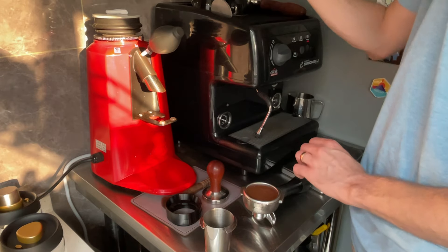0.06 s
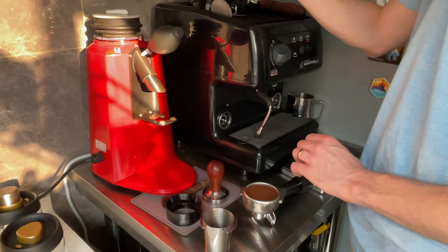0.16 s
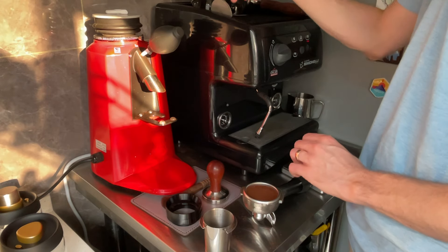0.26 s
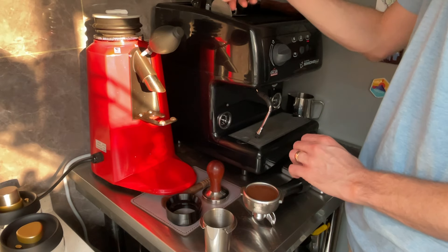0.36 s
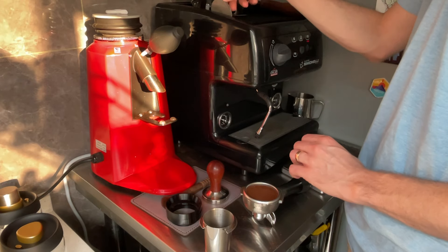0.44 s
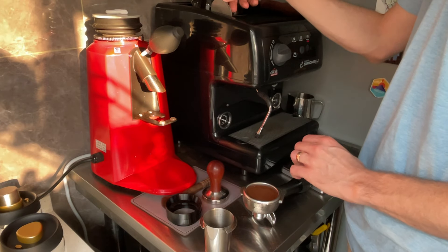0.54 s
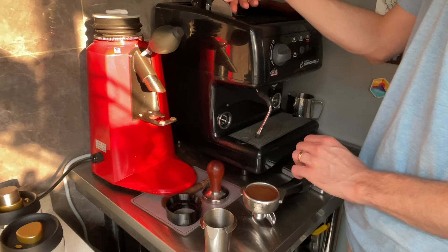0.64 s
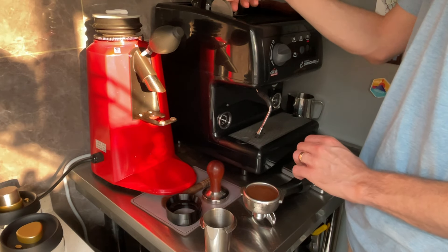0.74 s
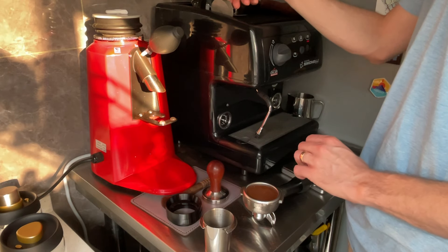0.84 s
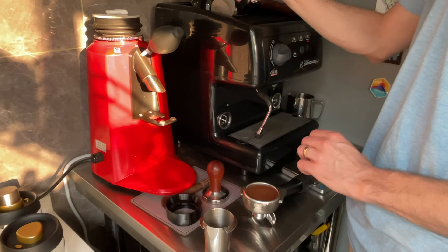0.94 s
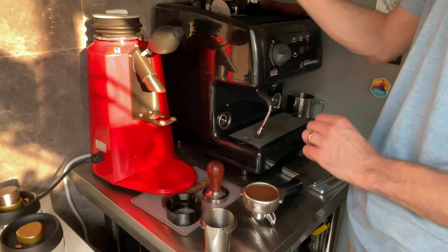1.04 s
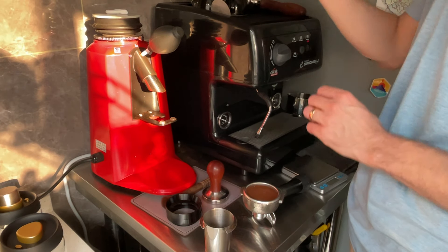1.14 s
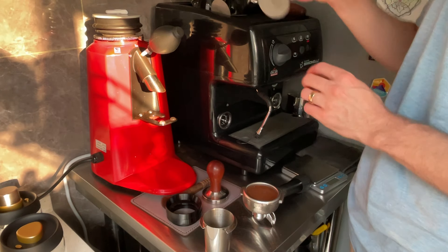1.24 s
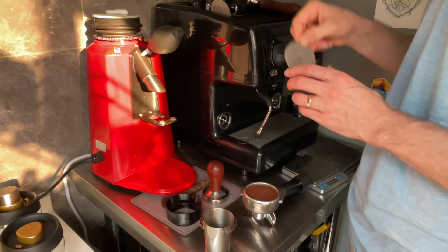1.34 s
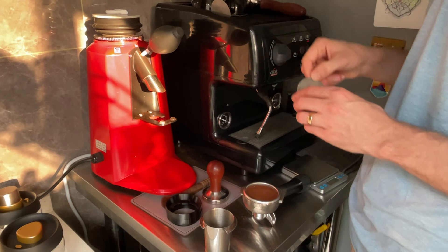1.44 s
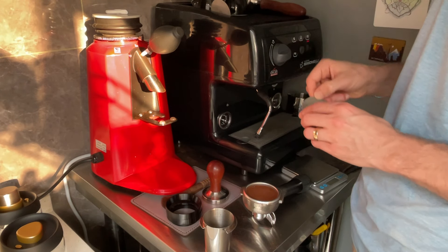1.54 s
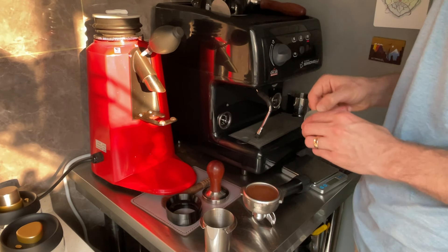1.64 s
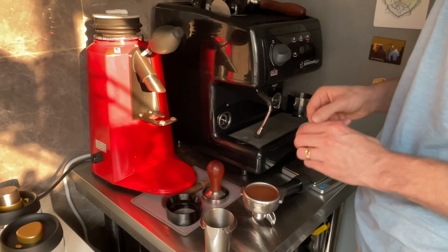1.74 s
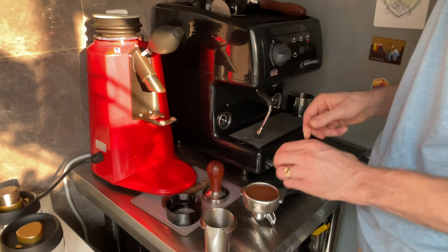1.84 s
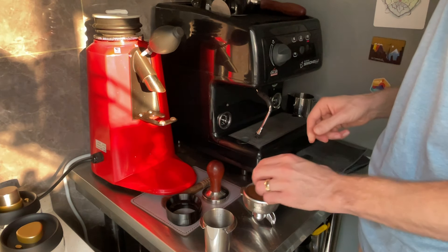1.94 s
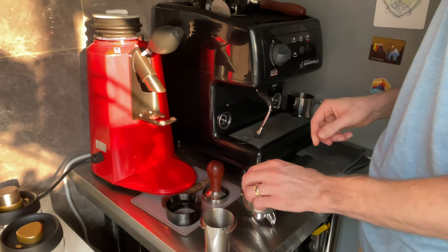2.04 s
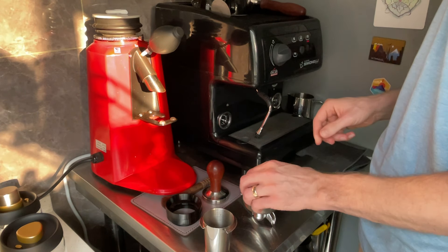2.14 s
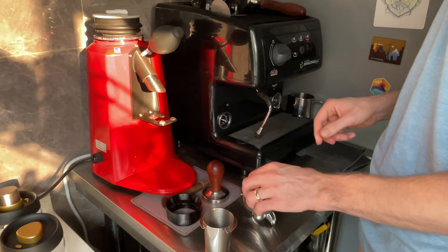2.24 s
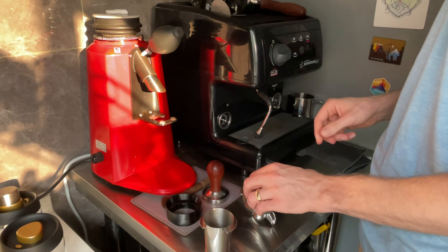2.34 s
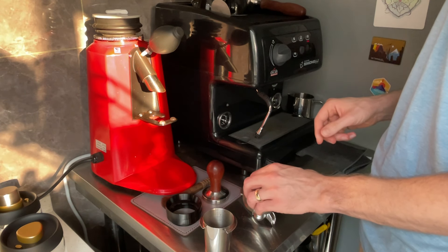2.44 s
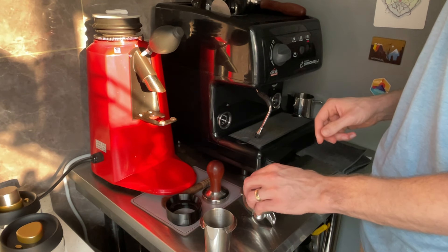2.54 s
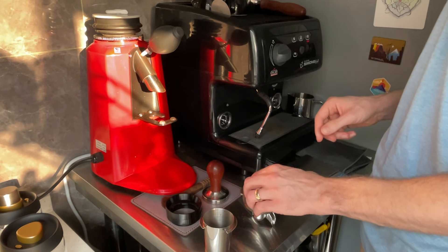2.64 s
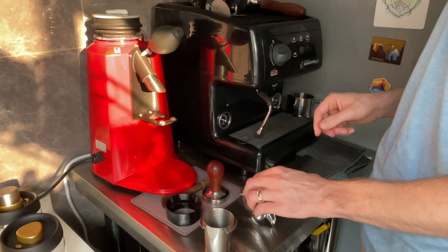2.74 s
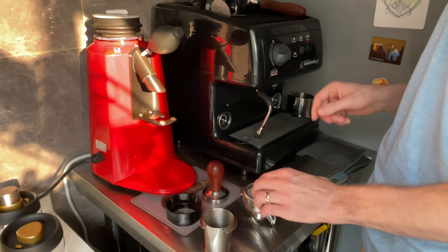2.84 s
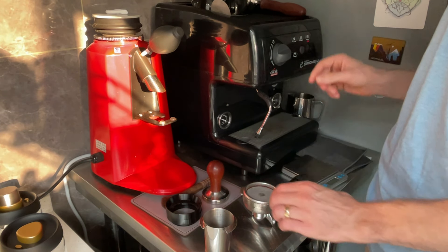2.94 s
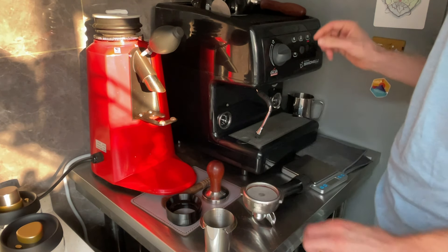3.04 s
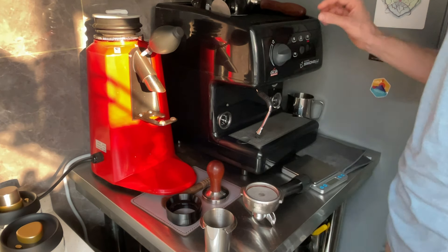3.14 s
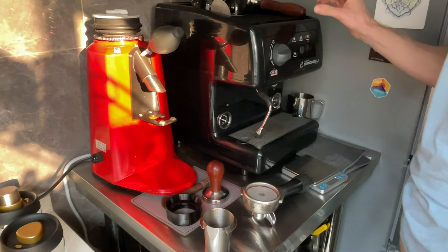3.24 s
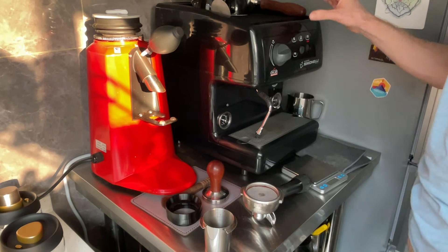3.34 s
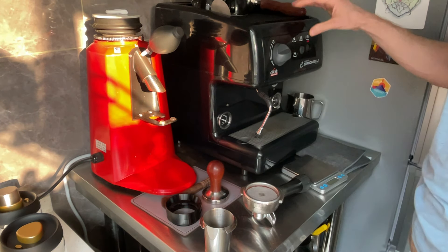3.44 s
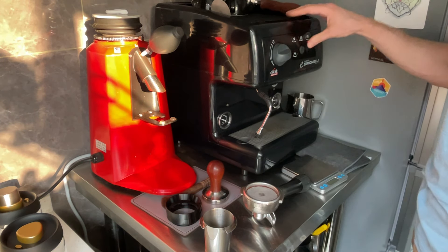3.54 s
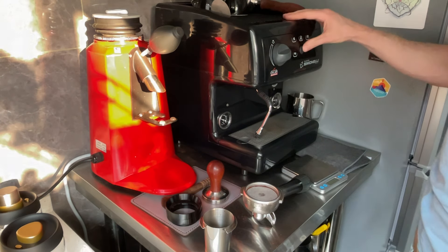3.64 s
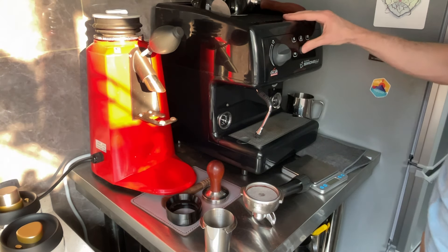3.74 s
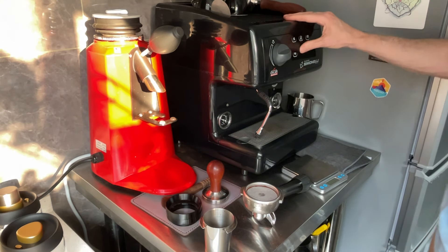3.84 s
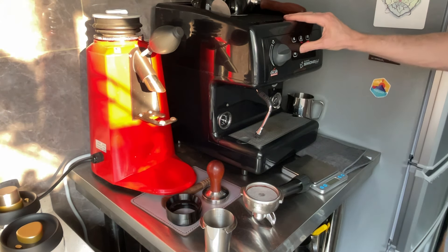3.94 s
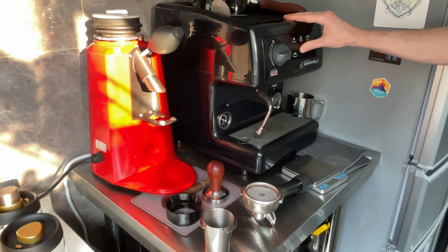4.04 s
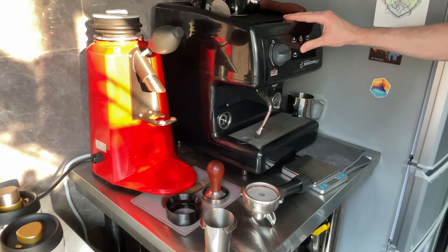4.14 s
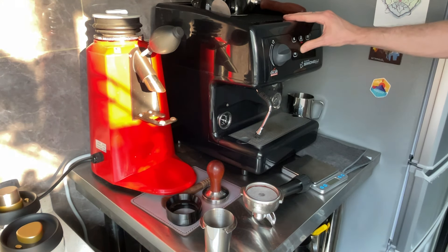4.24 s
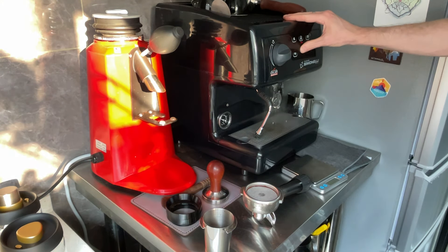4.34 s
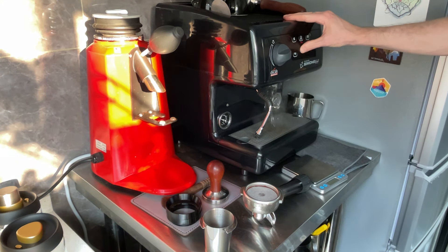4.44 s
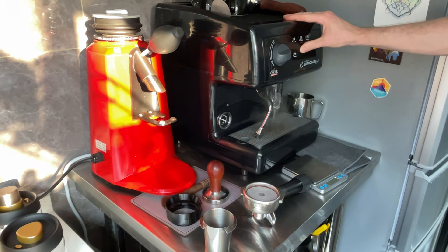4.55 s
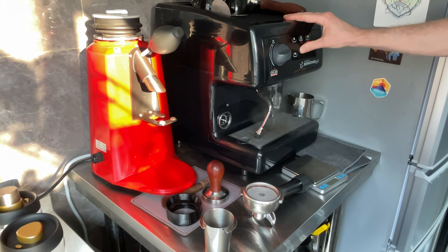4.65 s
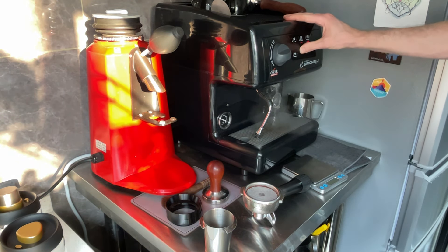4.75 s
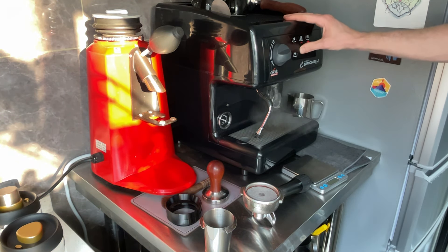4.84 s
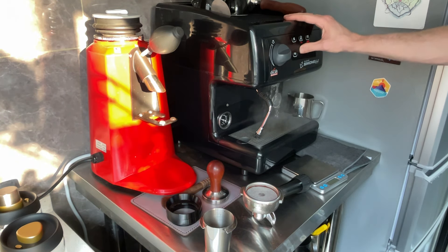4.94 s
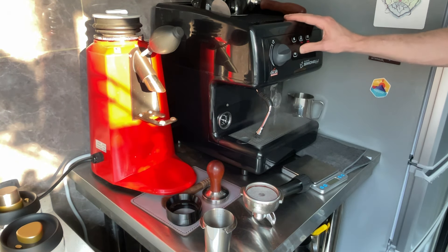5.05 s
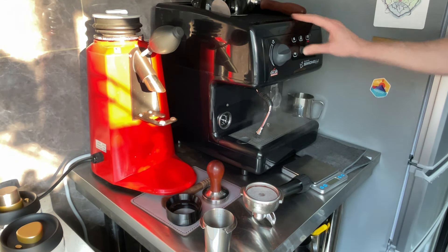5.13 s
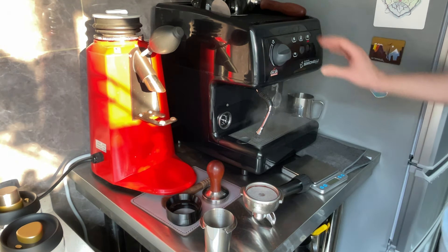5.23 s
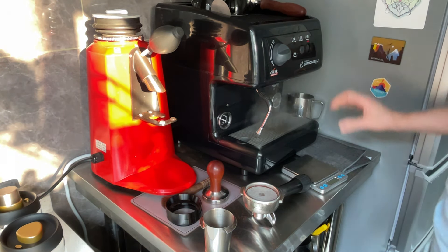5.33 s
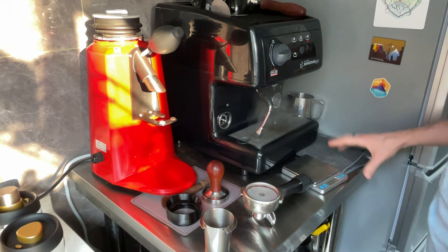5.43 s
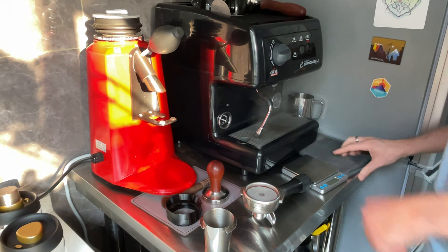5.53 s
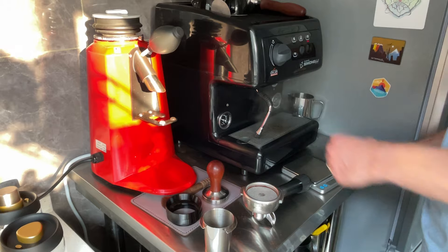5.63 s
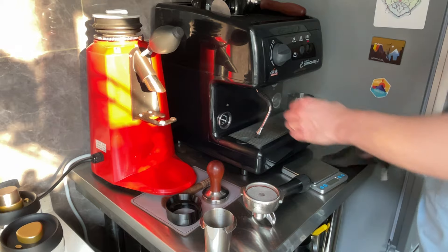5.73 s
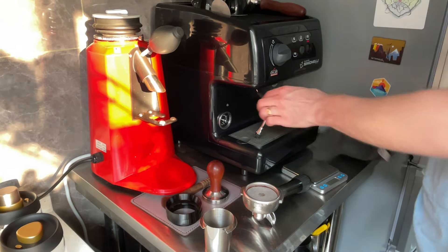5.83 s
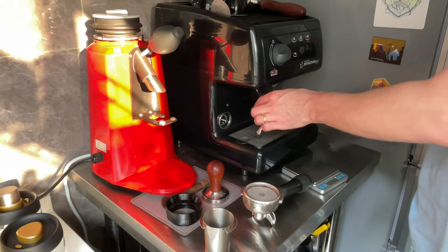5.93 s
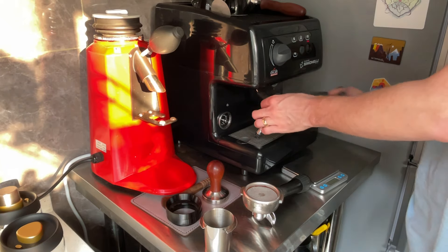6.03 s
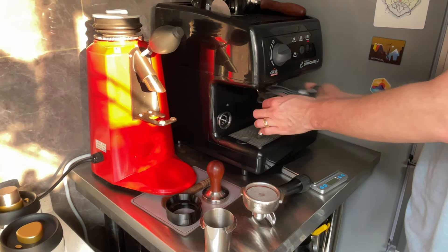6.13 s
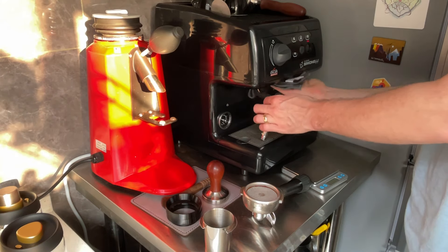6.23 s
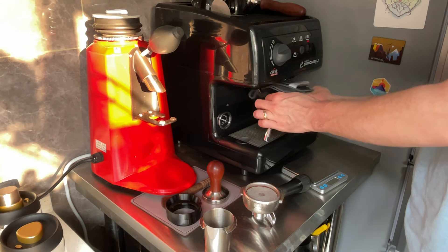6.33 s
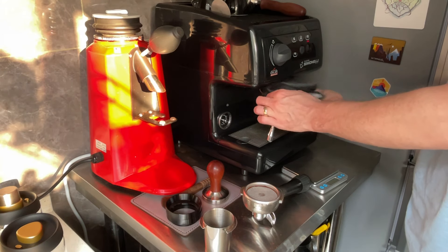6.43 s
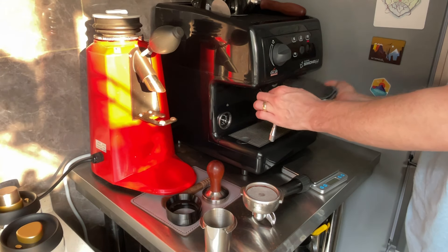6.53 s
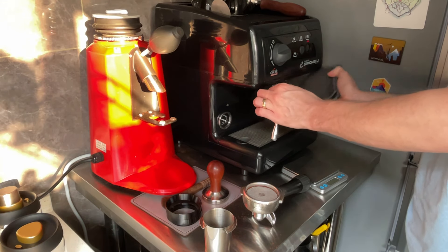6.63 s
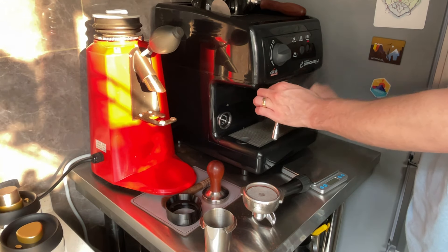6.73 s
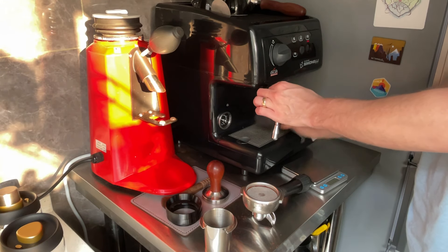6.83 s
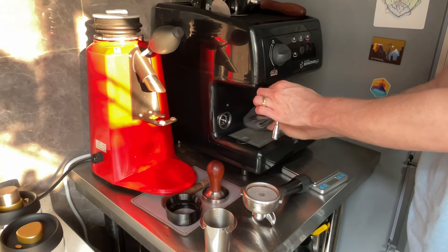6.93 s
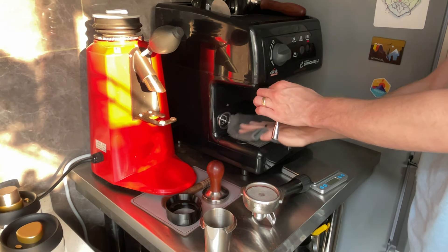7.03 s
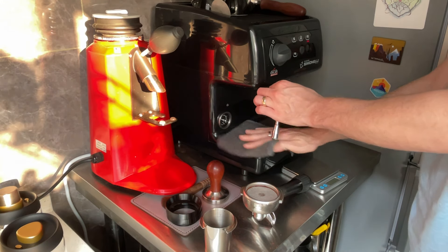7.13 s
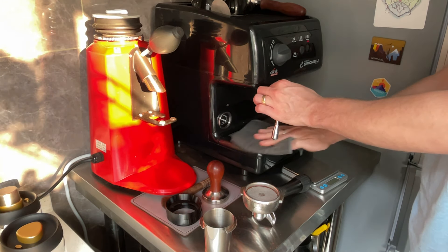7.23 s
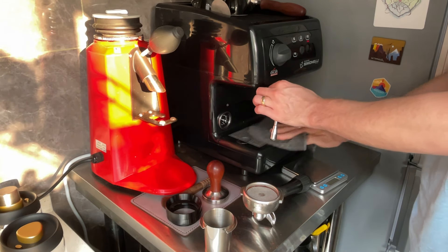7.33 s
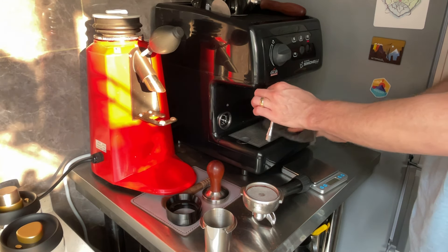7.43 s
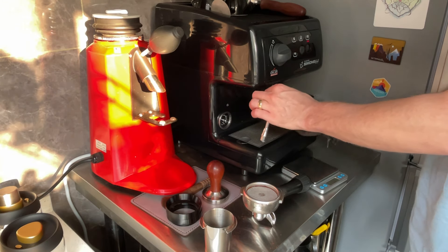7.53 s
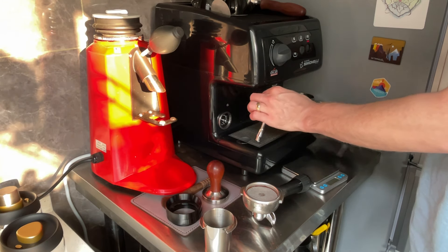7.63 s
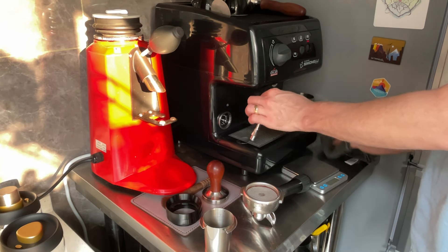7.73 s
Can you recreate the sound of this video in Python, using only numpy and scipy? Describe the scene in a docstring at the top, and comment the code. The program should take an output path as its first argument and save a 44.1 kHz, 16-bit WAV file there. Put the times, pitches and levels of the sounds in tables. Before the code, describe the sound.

Faint room hum, light clinks and a short scrape lead to a ringing metal set-down, then a small squeak and dull tick of a screen. Hand rubs and a sharp switch snap start the espresso machine: whistling flow, rattling low pump buzz and spattering hot water with steam hiss. It cuts off abruptly, tailing away in the small kitchen. Sparse drips, cloth strokes and hollow tray knocks finish, heard nearby in stereo.

```python
"""Small kitchen: an espresso machine is flushed, over dull air and a low drone.
First a tool is slid and set down on top and a screen is laid on the basket: friction is dense random
grains, and each blow is a noise crash, decaying modes and a room tail. The valve snaps open; a 50 Hz pump
buzzes in harmonics and a rattle, the valve sings in narrow-band noise, and water sprays as filtered grains.
The valve shuts, the last drops fall, and a cloth wipes the machine, knocking the tray about."""
import sys
import numpy as np
from scipy import signal
from scipy.fft import rfft, irfft, next_fast_len
from scipy.io import wavfile

SR = 44100
rng = np.random.default_rng(int(sys.argv[2]) if len(sys.argv) > 2 else 0)


def log_audio(samples):
    """Write samples as a 16-bit WAV file to the path given in sys.argv[1]."""
    # one column per channel
    frames = np.atleast_2d(samples).T
    # limit to full scale, then quantise
    limited = np.clip(frames, -1, 1)
    pcm = np.round(limited * 32767).astype(np.int16)
    wavfile.write(sys.argv[1], SR, pcm)


N = 343098
TIME = np.arange(N) / SR   # s
OPEN_S, SHUT_S = 3.9, 5.121   # the flush: the valve opens and shuts
FILL_S, WATER_RISE_S = 0.074, 0.094   # the group head fills, then the water comes up
# likeness of the two microphone ports for sounds near the machine: f/Hz, correlation
LIKENESS = [(60, 1), (130, 0.91), (320, 0.84), (640, 0.22), (1100, 0.2), (1900, 0.33), (2700, .38),
            (3300, 0.45), (4800, 0.34), (5500, 0.27), (6500, 0.55), (7700, 0.9), (9200, .82), (10500, 0.77),
            (11600, 0.83), (12900, 0.65), (14000, 1)]
# resonances of case and tray under pump and spray: f/Hz, width/Hz, level/dB
CASE = [(382.2, 14, 14.5), (448, 26, 16.5), (623, 20, 12.5), (673, 25, 4.5), (756.5, 60, 9.5),
        (990, 31, 11), (1107, 33, 10), (1200, 85, 14), (1356, 82, 9.5), (1548, 42, 14), (1710, 41, 5),
        (1882, 100, 12), (2166, 60, 11.5), (2380, 20, 4), (2552, 68, 9.5), (2816, 76, 10.5),
        (3030, 52, 12.5), (3296, 150, 10), (3630, 76, 9.5), (3780, 46, 6), (4040, 33, 9.5), (4380, 32, 5.5),
        (4610, 87, 6), (5420, 44, 2), (5900, 99, 3.5), (6000, 50, 2.5), (6200, 25, 7.5)]
# spectral density of light metal contacts: f/Hz, level/dB
CLINK_COLOUR = [(300, -7), (1100, 6), (3000, -1), (5000, -14.5), (8000, -24), (15000, -35)]


def from_db(db):
    """Level to amplitude ratio: 20 dB is a factor of ten."""
    return 10 ** (np.asarray(db) / 20)


def rms_one(x):
    """Normalisation to unit root-mean-square amplitude."""
    return x / np.sqrt(np.mean(x ** 2) + 1e-20)


def at_hz(points, hz):
    """Interpolation of a curve along logarithmic frequency."""
    points = np.array(points)
    return np.interp(np.log(hz + 1), np.log(points[:, 0]), points[:, 1])


def decay(t, t60):
    """Exponential decay: the amplitude falls 60 dB in the time t60."""
    return np.exp(-np.log(1000) * t / max(t60, 1e-3))


def held(start_s, rise_s, end_s, t60):
    """Linear onset, steady state and exponential decay after the end."""
    onset = np.clip((TIME - start_s) / max(rise_s, 1e-3), 0, 1)
    return onset * decay(np.maximum(TIME - end_s, 0), t60)


def sweep(peak_s, swell_s, fade_s):
    """Hand movement speeding up and slowing: swell and fade each span 20 dB, at a constant dB rate."""
    before = (peak_s - TIME) / max(swell_s, .01)
    after = (TIME - peak_s) / max(fade_s, .01)
    return from_db(-20 * np.maximum(before, after))


def drift(rate):
    """Slow random modulation of spread 1: chance values joined by lines, `rate` of them a second."""
    knots = rng.standard_normal(2048)
    return np.interp(TIME * rate, np.arange(len(knots)), knots) * np.sqrt(3 / 2)


def colour(x, spectrum, tilt_db=0, peaks=(), ripple_db=0):
    """Linear filtering by a spectrum, a tilt per octave, resonances and a random ripple; rms 1."""
    size = next_fast_len(x.shape[-1])
    hz = np.fft.rfftfreq(size, 1 / SR)
    db = at_hz(spectrum, hz) + tilt_db * np.log2(np.maximum(hz, 200))
    # the ripple stands for crowded weaker resonances
    ripple_hz = np.geomspace(500, 16000, 160)
    db += ripple_db * np.interp(hz, ripple_hz, rng.standard_normal(160), left=0)
    power = 1
    for centre, width, peak_db in peaks:
        power = power + (from_db(peak_db) ** 2 - 1) / (1 + (2 * (hz - centre) / width) ** 2)
    gain = from_db(db) * np.sqrt(np.maximum(power, 1e-3))
    return rms_one(irfft(rfft(x, size) * gain, size)[..., :x.shape[-1]])


def grains(per_s, spread_db):
    """Shot noise: tiny impacts of uneven size at random moments, independent on both sides."""
    sizes = from_db(spread_db * np.minimum(rng.exponential(1, (2, N)), 4))
    sizes = sizes * rng.standard_normal((2, N))
    return rms_one(sizes * (rng.random((2, N)) < per_s / SR))


def blows(rows, spectrum, modes, modes_db, room_db, room_tilt_db, attack_s, peaks=()):
    """Impact excitation: a crash of dense modes, a few longer rings and a tilted reverberant tail."""
    room_t60_s, ripple_db = 0.49, 3
    out = np.zeros((2, N + SR))
    t = np.arange(SR * 3 // 4) / SR
    for s, db, tilt_db, t60 in rows:
        crash = colour(rng.standard_normal((2, len(t))), spectrum, tilt_db, peaks, ripple_db)
        tail_tilt_db = tilt_db + room_tilt_db
        tail = colour(rng.standard_normal((2, len(t))), spectrum, tail_tilt_db, peaks, ripple_db)
        rings = 0
        for hz, mode_db, ring_s in modes:
            strength = from_db(mode_db + 2 * rng.standard_normal())
            cycles = hz * t + rng.random((2, 1))
            rings = rings + strength * decay(t, ring_s) * np.sin(2 * np.pi * cycles)
        blow = crash * decay(t, t60) + from_db(room_db) * tail * decay(t, room_t60_s)
        blow = blow + from_db(modes_db) * rings
        onset = 1 - np.exp(-t / max(attack_s, 1e-4))
        start = round(s * SR)
        out[:, start:start + len(t)] += from_db(db) * blow * onset
    return out[:, :N]


def ports(x, likeness):
    """Spatial coherence: two close microphone ports hear frequency-dependent likeness and phase lead."""
    # phase by which the left port leads: f/Hz, phase/rad
    port_lead = [(300, 0), (1100, .5), (1900, -.6), (3100, .7), (4000, .2), (5000, .6), (5700, -2.2),
                 (6500, -1.9), (7700, -3.2), (9000, -4.4), (10400, -6.2), (11600, -6.35), (12700, -7.4),
                 (14000, -9.3)]
    size = next_fast_len(N)
    hz = np.fft.rfftfreq(size, 1 / SR)
    alike = np.clip(at_hz(likeness, hz), -.99, .99)
    mid, side = rfft(x, size) * np.sqrt([(1 + alike) / 2, (1 - alike) / 2])
    turn = np.exp(.5j * at_hz(port_lead, hz))
    return irfft(np.array([(mid + side) * turn, (mid - side) / turn]), size)[:, :N]


def kitchen(air_db=-51.5, drone_db=-55.5):
    """Stationary noise: dull steady air, and a narrow band near 100 Hz that wavers as a drone."""
    # spectral density of the air: f/Hz, level/dB
    room = [(20, -25.5), (30, -15), (42, 2), (62, -5.5), (79, -0.5), (100, -3), (125, -7.5), (155, -5),
            (200, -9), (310, -11), (430, -10), (560, -16.5), (1100, -15.5), (1600, -27), (2500, -31.5),
            (4000, -47), (7000, -54), (15000, -75)]
    drone_band = [(70, -40.5), (92, -4.5), (101, 14.5), (110, -10.0), (140, -61.5)]   # f/Hz, level/dB
    air = colour(rng.standard_normal((2, N)), room)
    drone = colour(rng.standard_normal((2, N)), drone_band)
    return from_db(air_db) * air + from_db(drone_db) * drone


def cloth(flutter_db=-0.5):
    """Stick-slip friction of hand or cloth: fibres catch and let go, and pressure makes the machine rumble."""
    # strokes over the machine: peak t/s, brushing level/dB, rumble level/dB, swell/s, fade/s
    strokes = [(0.05, -71.5, -57, 0.17, 0.27), (1.43, -85, -57, 0.11, .2), (1.9, -81, -60, 0.069, 0.074),
               (2.33, -89, -55.5, 0.092, 0.12), (3.17, -74, -74, 0.23, .2), (3.308, -60, -58, 0.16, 0.17),
               (3.65, -54.5, -48, 0.17, 0.31), (3.85, -61.5, -48, 0.17, 0.22), (5.64, -62, -64, 0.4, 0.36),
               (6.24, -71.5, -48, 0.14, 0.19), (6.42, -64, -77, 0.24, 0.3), (6.71, -68.5, -53, 0.15, 0.099),
               (6.86, -60, -43.5, 0.094, 0.2), (7.01, -60, -42.5, 0.24, 0.48),
               (7.14, -62.5, -59, 0.26, 0.48), (7.31, -64, -48, 0.18, 0.22), (7.39, -59.5, -46, 0.1, 0.24),
               (7.49, -73, -47, 0.06, 0.223), (7.78, -70.5, -55, 0.191, 0.18)]
    # spectral density of the fibres: f/Hz, level/dB
    fibre_colour = [(100, -18), (1000, -14), (2000, -15), (3500, -20), (6000, -23.5), (9000, -27),
                    (12000, -32), (15000, -47)]
    # spectral density of the rumble: f/Hz, level/dB
    rumble_colour = [(40, 13), (90, 6), (280, 9), (600, -1), (1000, -5), (1800, -24.5), (4000, -38.5),
                     (12000, -44.5)]
    fibres = colour(grains(8000, 0.81), fibre_colour, ripple_db=3) * from_db(flutter_db * drift(26))
    rumble = colour(grains(1200, 2), rumble_colour, ripple_db=2.5) * from_db(1.6 * drift(28))
    # overlapping strokes add in power
    brushing, pressing = 0, 0
    for s, brush_db, rumble_db, swell_s, fade_s in strokes:
        speed = sweep(s, swell_s, fade_s)
        brushing = brushing + (from_db(brush_db) * speed) ** 2
        pressing = pressing + (from_db(rumble_db) * speed) ** 2
    return np.sqrt(brushing) * fibres + np.sqrt(pressing) * rumble


def tool_slide():
    """Sliding friction: many small catches excite resonances as the tool is pushed over the cup warmer."""
    # pushes of the tool: t/s, length/s, level/dB
    pushes = [(0.47, .04, -54.5), (0.601, 0.13, -49), (0.753, 0.099, -61)]
    # resonances of the sliding tool: f/Hz, width/Hz, level/dB
    slide_peaks = [(710, 76, 11), (1102, 28, 23.5), (1290, 85, 18.5), (1980, 40, 16)]
    spectrum = [(200, -4), (700, 5), (1300, -6.5), (2200, -20), (6000, -50), (14000, -58)]   # f/Hz, level/dB
    force = sum(from_db(db) * held(s, .026, s + length_s, .34) for s, length_s, db in pushes)
    return force * colour(grains(2500, 0.91), spectrum, peaks=slide_peaks)


def clinks():
    """Modal ringing of a tool picked up with light clinks."""
    # clinks: t/s, level/dB, tilt/(dB per octave), T60/s
    rows = [(.472, -51, -1.5, 0.07), (.489, -53, -2.5, 0.08)]
    # modes of the tool: f/Hz, level/dB, T60/s
    modes = [(1303, 3.5, 0.28), (1755, -6, .1), (2783, -8.5, .18), (2988, -8.5, .14), (4129, -10.5, .15),
             (4290, -13, .1), (6476, -24, .12)]
    return blows(rows, CLINK_COLOUR, modes, modes_db=-4, room_db=-7, room_tilt_db=-.5, attack_s=.004)


def tap():
    """Modal ringing of the cup warmer under one bright tap."""
    # tap: t/s, level/dB, tilt/(dB per octave), T60/s
    rows = [(.794, -51, 5, 0.039)]
    # modes of the cup warmer: f/Hz, level/dB, T60/s
    modes = [(985, 1, .3), (1986, -6, .2), (2126, -2, .14), (2480, -8, .12), (3106, -4, .14),
             (4382, -6, .09), (4942, -12, .14)]
    return blows(rows, CLINK_COLOUR, modes, modes_db=-5, room_db=-7, room_tilt_db=-.5, attack_s=.0015)


def tools():
    """Repeated impact: a metal tool set down on top of the machine strikes and rings several times."""
    # contacts: t/s, level/dB, tilt/(dB per octave), T60/s
    rows = [(.909, -48.5, 2, 0.3), (.924, -42.5, 3, 0.11), (.937, -41.5, 6.5, 0.11),
            (.950, -37.5, -1, 0.15), (.9845, -32, 8, 0.084), (.990, -31, 3.5, 0.12),
            (.998, -35.5, -3, 0.07)]
    # spectral density of the crash: f/Hz, level/dB
    spectrum = [(100, -4), (400, 4.5), (700, 7.5), (1100, 9), (1600, 0.5), (3000, -6.5), (4500, -14.5),
                (7000, -22.5), (11000, -37), (15000, -50)]
    # modes of the tool: f/Hz, level/dB, T60/s
    modes = [(690, 0, 0.3), (791, -5, 0.35), (1088, 7, 0.33), (1270, 4, 0.13), (1600, -10, 0.2),
             (1890, 1, 0.1), (2130, -7, 0.1), (2790, -13, 0.35), (4110, -13, 0.2)]
    return blows(rows, spectrum, modes, modes_db=-11.0, room_db=-7, room_tilt_db=-2.1, attack_s=.002)


def knocks():
    """Damped impact: dull knocks at the counter excite short low modes."""
    # knocks: t/s, level/dB, tilt/(dB per octave), T60/s
    rows = [(1.301, -46.5, -.8, .07), (3.169, -45, 0, .1), (3.204, -52, 0, .06)]
    # spectral density of the crash: f/Hz, level/dB
    spectrum = [(100, -9), (420, -5), (600, -6), (800, 2), (1400, -10), (3000, -23), (7000, -36),
                (15000, -58)]
    # modes of the knocks: f/Hz, level/dB, T60/s
    modes = [(447, -6.5, 0.17), (795, 2, 0.13), (835, -5, .14), (1063, -3, 0.12), (1290, -10, .1)]
    return blows(rows, spectrum, modes, modes_db=-4, room_db=-10, room_tilt_db=-.3, attack_s=.0016)


def squeak():
    """Stick-slip oscillation: the screen squeaks once on the basket rim, an unsteady tone with grit."""
    start_s, length_s, pitch_hz, level_db = 2.662, .035, 1875, -62.5
    slip = from_db(level_db) * held(start_s, .017, start_s + length_s, .17)
    cycles = pitch_hz * TIME + .16 * drift(110) + rng.random((2, 1))
    grit_colour = [(300, -8), (750, 10), (1500, -23), (5000, -27), (14000, -31)]   # f/Hz, level/dB
    grit = colour(grains(2500, 1.3), grit_colour)
    return slip * (np.sqrt(2) * np.sin(2 * np.pi * cycles) + from_db(4) * grit)


def screen():
    """Modal ringing of the screen as it drops on the basket and settles."""
    # contacts: t/s, level/dB, tilt/(dB per octave), T60/s
    rows = [(2.716, -46, -.7, .09), (2.744, -49, -4, .1)]
    # spectral density of the crash: f/Hz, level/dB
    spectrum = [(100, -2), (430, 1), (680, -4), (950, 1), (1400, -15), (1900, -17), (3500, -31),
                (5000, -31), (5800, -18), (6600, -23), (11000, -34), (15000, -48)]
    # modes of the screen: f/Hz, level/dB, T60/s
    modes = [(433, 4.5, 0.19), (593, -3, .12), (898, -5, .14), (1880, -10, .08), (4404, -22, .13),
             (5900, -25, .06)]
    return blows(rows, spectrum, modes, modes_db=-4, room_db=-8.5, room_tilt_db=-0.5, attack_s=.00082)


def rubs():
    """Friction noise: the arm brushes the shirt and the palm scrapes on to the case."""
    # rubs: peak t/s, level/dB, swell/s, fade/s
    rows = [(3.07, -73, 0.44, .4), (3.305, -61, .06, 0.14), (3.648, -55, .07, 0.085)]
    # spectral density of the rubbing: f/Hz, level/dB
    spectrum = [(300, -14), (1000, -8.5), (1650, -1), (3000, -3.5), (5500, -7.5), (8000, -14.5),
                (14000, -29.5)]
    rubbing = sum(from_db(db) * sweep(s, swell_s, fade_s) for s, db, swell_s, fade_s in rows)
    return rubbing * colour(grains(5000, 1.2), spectrum, ripple_db=3.5)


def button():
    """Sliding friction: the button rubs harder in its guide to a peak near the valve's opening, then fades."""
    press = from_db(-46.5) * sweep(3.85, .12, .25)
    spectrum = [(200, -6), (700, -1), (1150, 3), (1600, -6), (2600, -17), (6000, -21),
                (14000, -42)]   # f/Hz, level/dB
    return press * colour(grains(3100, 1.5), spectrum, ripple_db=1.2)


def valve():
    """Impact resonance: switch and solenoid valve snap, and the valve body rings."""
    # snaps: t/s, level/dB, tilt/(dB per octave), T60/s
    rows = [(3.883, -26, 1.5, 0.09), (3.8935, -13, 8, 0.06), (3.8965, -16, -1, .04), (3.899, -13, -1, 0.04),
            (3.9045, -12.5, -1, 0.049), (5.118, -20, -1.5, 0.08), (5.13, -21.5, -3.5, 0.09)]
    # spectral density of the crash: f/Hz, level/dB
    spectrum = [(50, -29.5), (110, -8.5), (300, -5.5), (650, -16), (1100, -7), (1700, -1.5), (2200, -5.5),
                (3000, -4), (5000, -9), (8000, -8), (11000, -7), (15000, -18.5)]
    # modes of the valve: f/Hz, level/dB, T60/s
    modes = [(1095, 3, 0.13), (1503, -2.5, 0.1), (1868, -7, 0.15), (2700, -7, 0.12), (3010, -6.5, .14),
             (4400, -10, .07)]
    # resonances of the valve body: f/Hz, width/Hz, level/dB
    body_peaks = [(790, 53, 14), (1030, 45, 7.5), (1620, 87, 6), (1850, 90, 9.5), (2600, 130, 8.5),
                  (2860, 80, 5), (3500, 110, 1), (3750, 68, 6), (4200, 200, 7.5), (6600, 300, 6.5)]
    return blows(rows, spectrum, modes, modes_db=-11, room_db=-14, room_tilt_db=-.3, attack_s=.0013,
                 peaks=body_peaks)


def valve_song():
    """Flow noise: water forced past the valve sings in two bands, loud until the group head fills, then soft."""
    bands = [(1500, -43.0), (1780, -9.5), (1880, -0.5), (2000, -11.0), (2400, -37.5), (3200, -28.0),
             (3620, -9.5), (4100, -34.5), (8000, -62)]   # f/Hz, level/dB
    empty_db, full_db, rise_s, t60_s = -29.5, -40.5, 0.075, 0.55
    sputter_db, sputters_per_s = 3.5, 35
    song = colour(rng.standard_normal((2, N)), bands, ripple_db=-1.0)
    filled_s = OPEN_S + FILL_S + WATER_RISE_S / 2
    filling = from_db(empty_db) * held(OPEN_S, rise_s, filled_s, t60_s)
    flowing = from_db(full_db) * held(OPEN_S, rise_s, SHUT_S, t60_s)
    return np.maximum(filling, flowing) * from_db(sputter_db * drift(sputters_per_s)) * song


def spray(per_s=9000, spread_db=1.5, surge_db=1.1, wander_db=2):
    """Droplet impact noise: a bright spit of steam, a gush, then hot water spattering on the tray."""
    # spectral density of water and steam: f/Hz, level/dB
    spray_colour = [(60, -6), (200, -0.5), (300, -3.5), (400, -3.5), (700, 2), (1200, -4), (2000, -5),
                    (3400, -6), (4600, -8), (6400, -6.5), (8000, -9.5), (11000, -18.5), (13300, -22.5),
                    (14400, -47)]
    # spectral density of the first gush through the empty shower screen: f/Hz, level/dB
    gush_colour = [(500, -22), (1300, -10), (2300, 0), (2800, -5), (4000, -16), (14000, -50)]
    water_db, sag_db_per_s = -27.5, 1.1
    run_on_s, drain_t60_s = 0.024, 0.5
    steam_db, steam_rise_s, spit_db, spit_t60_s = -32.5, 0.016, -32.5, 1.3
    open_for = np.maximum(TIME - OPEN_S, 0)
    dry_s = SHUT_S + run_on_s
    # the water's tone wanders slowly between two random ripples
    blend = np.pi / 4 + .7 * drift(7)
    ripple_a = colour(grains(per_s, spread_db), spray_colour, peaks=CASE, ripple_db=wander_db)
    ripple_b = colour(grains(per_s, spread_db), spray_colour, peaks=CASE, ripple_db=wander_db)
    water = np.cos(blend) * ripple_a + np.sin(blend) * ripple_b
    # water arrives once the group head has filled, and weakens slowly
    flow = from_db(water_db - sag_db_per_s * open_for)
    flow = flow * held(OPEN_S + FILL_S, WATER_RISE_S, dry_s, drain_t60_s)
    # steam escapes at once, settling from a spit to a steady hiss
    steam = colour(grains(per_s, spread_db), spray_colour, tilt_db=3.0, peaks=CASE, ripple_db=wander_db)
    escape = from_db(steam_db) + from_db(spit_db) * decay(open_for, spit_t60_s)
    escape = escape * held(OPEN_S, steam_rise_s, dry_s, drain_t60_s)
    gush = colour(grains(per_s, spread_db), gush_colour, ripple_db=wander_db)
    gush = from_db(-29.5) * sweep(3.975, .06, .3) * gush
    return (flow * water + escape * steam + gush) * from_db(surge_db * drift(45))


def pump(stroke_spread=0.1, jitter_s=.00006, rattle_db=-9, stroke_t60=0.067):
    """Periodic forcing: one piston stroke per mains cycle drives a resonant water line, case buzz and rattle."""
    # resonance of the water line, rising as air is driven out: t/s, f/Hz
    line_pitch = [(4.06, 189), (4.2, 250), (4.38, 270), (4.68, 301.4), (5.1, 341)]
    # pump harmonics: multiple of mains frequency, level/dB at mid-flush, change/(dB per s)
    orders = [(2, -15, 1), (3, -15, 3), (4, -23, 3), (5, -25.5, -1), (6, -27.5, 1), (8, -21.5, 0),
              (9, -14, -2.5), (10, -28, 8), (12, -14.5, -7), (13, -7.5, -7), (14, -18, -2.5), (15, -18, -4),
              (20, -18, -4), (22, -18, 0), (24, -16, -1), (25, -19, 5), (26, -20, -0.5), (37, -19, -4),
              (38, -21, -4), (42, -19, 0), (48, -19, 0), (72, -19, 0)]
    # spectral density of the rattle: f/Hz, level/dB
    rattle_colour = [(500, -55), (1100, -7), (1500, -12.5), (3500, 1), (6000, -17), (13200, -10.5),
                     (14400, -39)]
    mains_hz, line_q, line_top_hz = 50.02, 7.5, 325
    pump_db, load_s, rise_s, t60_s = -28.5, 0.069, 0.092, 0.54
    waver_depth, wavers_per_s = .22, 18
    clock = mains_hz * (TIME + jitter_s * drift(8))   # mains cycles
    running = (TIME > OPEN_S) & (TIME < SHUT_S + t60_s)
    line_hz = np.interp(TIME[running], *np.transpose(line_pitch))
    from_middle_s = np.minimum(TIME[running], SHUT_S) - (OPEN_S + SHUT_S) / 2
    hum = np.zeros((2, N))
    for order, db, db_per_s in orders:
        hz = order * mains_hz
        # only low harmonics pass through the line; the others take a random phase
        path = np.exp(2j * np.pi * rng.random())
        if hz < line_top_hz:
            path = 1 / (1 - (hz / line_hz) ** 2 + 1j * hz / line_hz / line_q)
        # a phase difference gives a pure tone its correlation between the ports
        apart = np.arccos(np.clip(at_hz(LIKENESS, hz), -1, 1)) / 2
        phase = 2 * np.pi * order * clock[running] + apart * np.array([[1], [-1]])
        # the complex waver varies strength and timing
        waver = (drift(wavers_per_s) + 1j * drift(wavers_per_s))[running]
        gain = from_db(db + db_per_s * from_middle_s) * (1 + waver_depth * waver)
        hum[:, running] += np.sqrt(2) * np.real(gain * path * np.exp(1j * phase))
    # each stroke repeats one knock with a slightly different strength
    strokes = np.diff(np.floor(clock), prepend=0).clip(0, 1) * (1 + stroke_spread * drift(40))
    t = np.arange(SR // 10) / SR
    knock = rng.standard_normal((2, len(t))) * decay(t, stroke_t60)
    rattle = signal.fftconvolve(strokes[None], knock, axes=1)[:, :N]
    rattle = colour(rattle, rattle_colour, peaks=CASE)
    load = held(OPEN_S + load_s, rise_s, SHUT_S, t60_s)
    return from_db(pump_db) * load * (hum + from_db(rattle_db) * ports(rattle, LIKENESS))


def latch():
    """Impact of the plunger snapping back: a brief bright crash without separate modes."""
    # snap: t/s, level/dB, tilt/(dB per octave), T60/s
    rows = [(5.119, -20.5, .5, .065)]
    # spectral density of the snap: f/Hz, level/dB
    spectrum = [(1000, 0), (1850, 17), (2400, -10), (3050, -8), (3500, -12), (4700, 8), (5450, 3),
                (6200, -17), (8000, -12), (9700, -1.5), (12000, -26), (15000, -18)]
    return blows(rows, spectrum, [], modes_db=0, room_db=-9.5, room_tilt_db=-12.0, attack_s=.00071)


def thumps():
    """Low-frequency body response: the case booms as the water is stopped and as the hand leans on it."""
    # booms: t/s, level/dB, tilt/(dB per octave), T60/s
    rows = [(5.126, -29, 1, .17), (5.205, -32, 4.5, .12), (5.536, -51, -1, 0.14), (6.262, -51, 4, .15),
            (7.288, -43, -8, 0.41), (7.47, -40, -5, 0.41)]
    # spectral density of the case: f/Hz, level/dB
    spectrum = [(50, -16), (90, 3), (160, -3), (240, 3), (330, -4), (600, -16), (1500, -34), (15000, -75)]
    return blows(rows, spectrum, [], modes_db=0, room_db=-14, room_tilt_db=0, attack_s=.004)


def drips():
    """Brief impact noise: last drops and small ticks, strongly damped."""
    # drops and ticks: t/s, level/dB, tilt/(dB per octave), T60/s
    rows = [(5.348, -53, -4, 0.035), (5.363, -49, -3, 0.029), (5.468, -65, 11, 0.016),
            (5.482, -71, -3, .02), (5.534, -56, 1.5, .04), (6.125, -59.5, -1.5, 0.019),
            (6.815, -46, -11, 0.015), (6.984, -56, 3, 0.026)]
    # spectral density of the ticks: f/Hz, level/dB
    spectrum = [(500, -14.5), (2000, -2.5), (5000, 0), (11000, -2.5), (15000, -7)]
    return blows(rows, spectrum, [], modes_db=0, room_db=-5.5, room_tilt_db=-5.0, attack_s=.00044)


def tray():
    """Modal ringing of the drip tray knocked under the cloth."""
    # knocks: t/s, level/dB, tilt/(dB per octave), T60/s
    rows = [(5.449, -45.5, -3, 0.07), (6.218, -52, -2.5, 0.17), (6.814, -40, 4.5, 0.12),
            (6.838, -43.5, 2, 0.087), (7.4525, -34, 6, 0.087), (7.468, -47, -2, 0.15),
            (7.59, -64, -2, 0.05), (7.688, -57.5, 3.5, .07)]
    # spectral density of the crash: f/Hz, level/dB
    spectrum = [(80, -43), (250, -11), (500, -1), (1000, -1), (1700, -12.5), (3500, -26.5), (5000, -33),
                (8000, -35.5), (15000, -53)]
    # modes of the tray: f/Hz, level/dB, T60/s
    modes = [(118.7, 1, 0.72), (280, -0.5, 0.53), (461, 2, 0.13), (657, -4, 0.35), (920, 2.5, 0.29),
             (1340, 2, 0.092), (1780, -1, 0.18), (3530, -10.5, 0.09)]
    return blows(rows, spectrum, modes, modes_db=-9, room_db=-10, room_tilt_db=-.8, attack_s=.002)


def wand():
    """Modal ringing of the steam wand bumped by the hand."""
    # bumps: t/s, level/dB, tilt/(dB per octave), T60/s
    rows = [(6.8845, -37, -1, .085), (6.951, -43.5, -1, .06), (7.040, -48, -3, .05), (7.166, -44, 0, .09),
            (7.252, -51, 3, .05), (7.286, -48, -2, .07)]
    # spectral density of the crash: f/Hz, level/dB
    spectrum = [(150, -27), (450, -2), (700, 5.5), (1050, 1), (1650, -6), (2100, -14), (3000, -21),
                (6000, -45), (15000, -55)]
    # modes of the wand: f/Hz, level/dB, T60/s
    modes = [(640, 2, 0.22), (757, -6.5, 0.055), (987, -1, 0.22), (1350, -18, .15), (1650, -8, 0.12)]
    return blows(rows, spectrum, modes, modes_db=-6, room_db=-12, room_tilt_db=-1, attack_s=.0015)


def scene():
    """Superposition: the running machine, off centre, reaches the sides unequally; the rest adds to it."""
    # lean of the running machine: f/Hz, left minus right level/dB
    machine_side = [(100, 1.5), (250, -3), (400, -2), (650, 6), (1300, 1), (2400, 0.5), (15000, 0)]
    # likeness of the ports for the diffuse air of the kitchen: f/Hz, correlation
    room_likeness = [(50, 1), (130, 0.9), (300, 0.42), (650, -0.013), (1200, -0.4), (1600, -.1),
                     (2300, .15), (3500, -0.24), (4800, .3), (6000, 0.43), (7900, 0.73), (11000, .7)]
    size = next_fast_len(N)
    side_db = at_hz(machine_side, np.fft.rfftfreq(size, 1 / SR)) * [[.5], [-.5]]
    machine = pump() + ports(spray() + valve_song() + latch(), LIKENESS)
    machine = irfft(rfft(machine, size) * from_db(side_db), size)[:, :N]
    friction = cloth() + tool_slide() + squeak() + rubs() + button()
    impacts = clinks() + tap() + tools() + knocks() + screen() + valve()
    impacts = impacts + thumps() + drips() + tray() + wand()
    return machine + ports(friction + impacts, LIKENESS) + ports(kitchen(), room_likeness)


def record(dry):
    """Band limiting: steep filters cut the deepest rumble and the top."""
    cutoff_hz = 15800
    dry = signal.sosfilt(signal.butter(8, 40, "high", fs=SR, output="sos"), dry)
    # 70 dB down from the stopband edge upwards
    return signal.sosfilt(signal.cheby2(14, 70, cutoff_hz + 700, fs=SR, output="sos"), dry)


dry = scene()
out = record(dry)
log_audio(out)
```